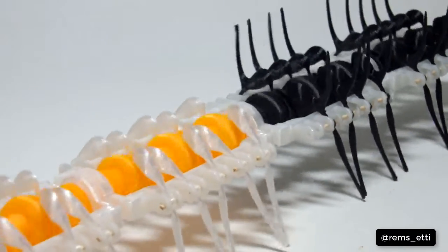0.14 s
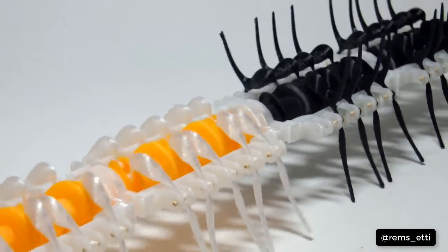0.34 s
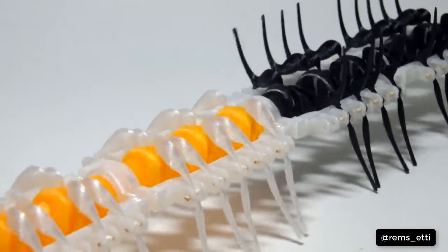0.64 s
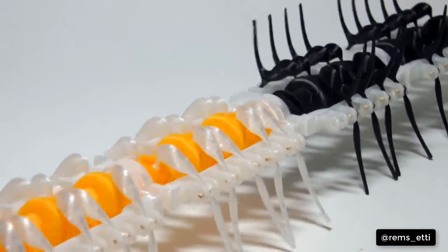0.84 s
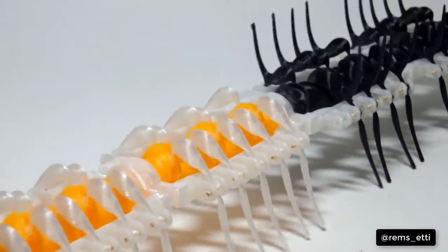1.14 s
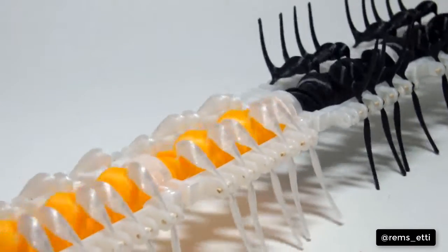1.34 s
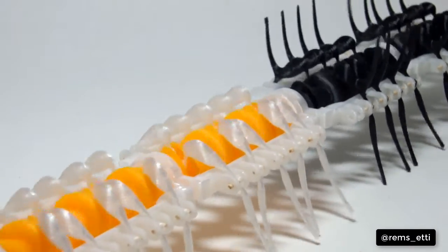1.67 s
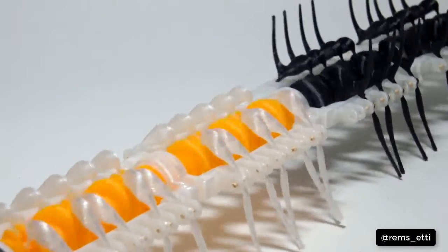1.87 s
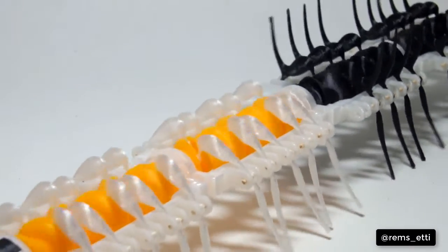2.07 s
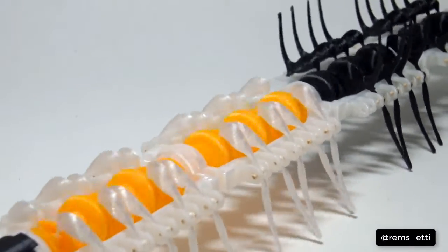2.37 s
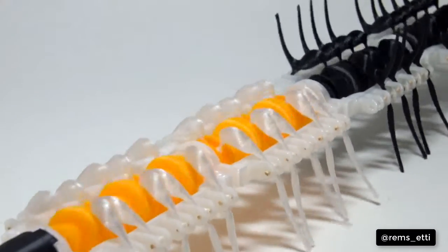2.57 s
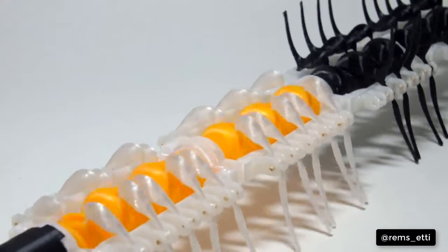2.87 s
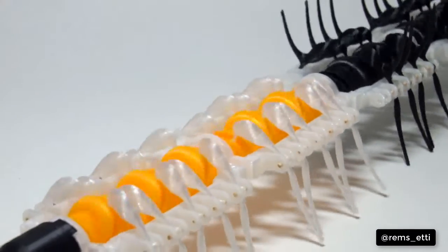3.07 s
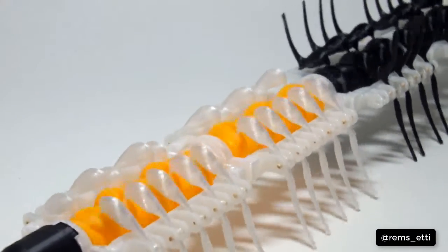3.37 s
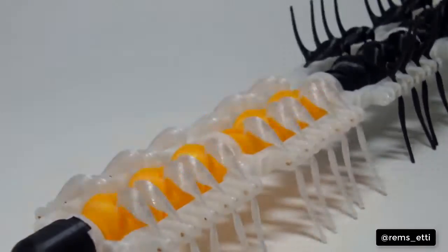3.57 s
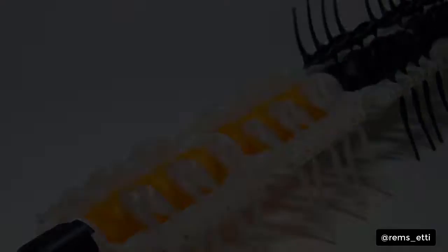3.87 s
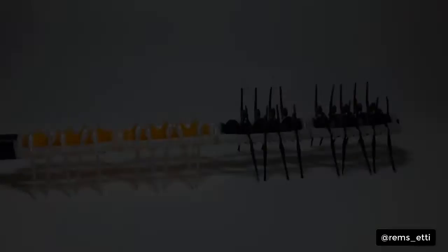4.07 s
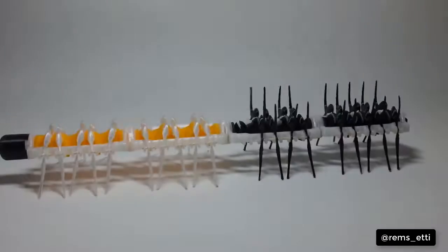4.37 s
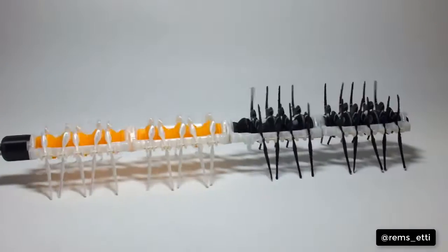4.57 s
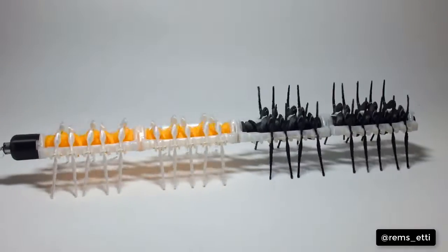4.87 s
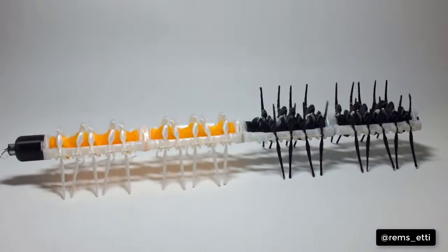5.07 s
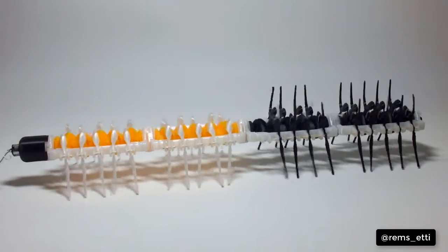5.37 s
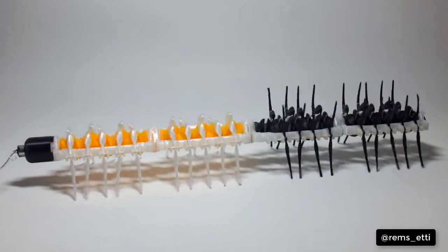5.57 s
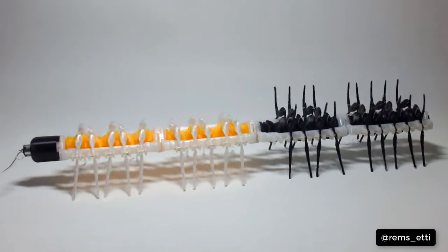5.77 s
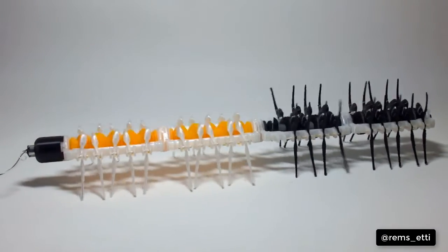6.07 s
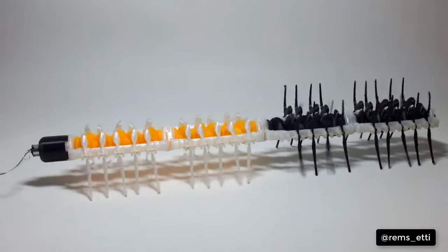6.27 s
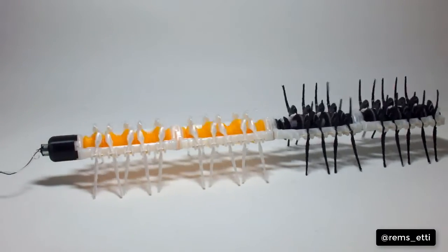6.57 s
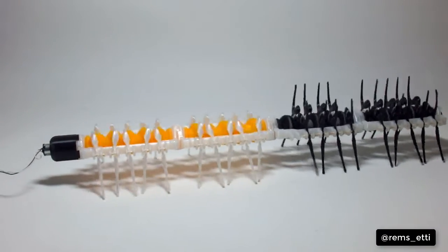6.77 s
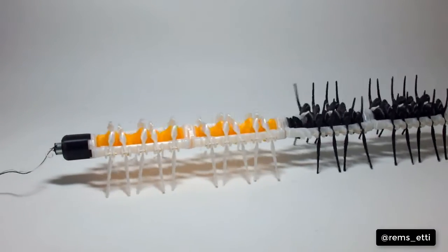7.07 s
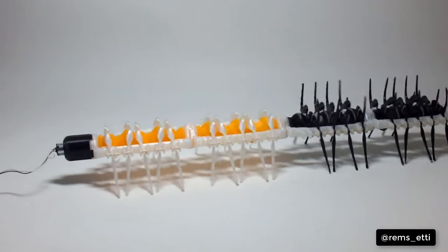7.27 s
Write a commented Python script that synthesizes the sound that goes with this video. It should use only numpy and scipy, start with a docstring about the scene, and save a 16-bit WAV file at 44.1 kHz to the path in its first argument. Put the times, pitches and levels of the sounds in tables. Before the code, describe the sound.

From 0 s a small motorized plastic model with many legs is already walking on a table, close to the microphone. A continuous broadband rub, dry and hissy with a hollow plastic body, surges every 0.45 s as the cam shaft turns. Two thin gear whines near 12 and 15 kHz waver with the load. Tiny squeaks of 20 to 90 ms, around 2.4 to 6 kHz and above 11 kHz, chirp constantly. Bright leg snaps tick at about 0.85, 1.3, 2.2, 3.4 and 4.45 s. Low table thrum grows around 3 s. From 3.5 to 4.55 s a farther pass overlaps the near one, briefly thicker, then continues alone: the same even rubbing, fainter whines, fewer squeaks, recurring chirps near 2.8 kHz. A faint low table hum appears near 7.15 s, over barely audible mains hum. It stops at 7.4 s, still running.

```python
"""Cams and legs of a many-legged plastic model rub and squeak once a turn as it walks on a table:
rubbing is noise through frame resonances, squeaks are gliding near-sines, snapping legs tick.
A small geared motor turns the cam shaft; its two gear whines are narrow noise that swings in pitch
as the load comes and goes. Mains hum, two steady sines, lies below.
A near pass and a farther pass overlap for a second."""
import sys
import numpy as np
from scipy import signal
from scipy.fft import rfft, irfft, next_fast_len
from scipy.io import wavfile

SR = 44100
rng = np.random.default_rng(int(sys.argv[2]) if len(sys.argv) > 2 else 0)


def how_loud(loudness_db):
    """Turn decibels into a plain amplitude multiplier (0 dB gives 1, 20 dB gives 10)."""
    steps = np.asarray(loudness_db, float) / 20
    return 10 ** steps


def file_out(sig):
    """Save sig as 16-bit WAV at sys.argv[1]."""
    # one column per channel
    cols = np.atleast_2d(sig).T
    # limit, then scale
    lim = np.clip(cols, -1, 1)
    pcm = np.round(lim * 32767).astype(np.int16)
    wavfile.write(sys.argv[1], SR, pcm)


N = 327222
TIME = np.arange(N) / SR
# passes: start/s, end/s, period of one shaft turn/s
NEAR_PASS, FAR_PASS = (0, 4.555, .4465), (3.54, 7.42, .4485)
# the loudest squeaks, stick-slip save the rows at .841 and 1.296 s, which are the bright tonal core of a short
# broadband tick: [t/s, length/s, start f/Hz, end f/Hz, peak rms level/dB before flutter]
LOUD_SQUEAKS = [(.035, .033, 14840, 15300, -37), (.196, .025, 5800, 5770, -41),
                (.21, 0.031, 4560, 4730, -36), (0.412, 0.075, 11500, 12400, -41),
                (.486, .034, 14960, 14700, -39), (0.566, 0.027, 2330, 2300, -41.5),
                (0.59, 0.036, 11060, 11600, -32), (.703, 0.043, 14650, 14850, -39),
                (.841, 0.031, 12100, 12260, -34.5), (0.945, 0.021, 14240, 14140, -39),
                (1.01, .04, 2380, 2320, -40), (1.296, 0.025, 13400, 13230, -36),
                (1.384, .02, 14540, 14700, -38), (1.487, .025, 11400, 11200, -31.5),
                (1.604, 0.028, 4620, 4520, -36.5), (1.763, .024, 11290, 11470, -37),
                (1.82, 0.037, 11770, 11600, -39), (1.9, .022, 4960, 4940, -37),
                (1.906, 0.062, 2390, 2330, -44), (2.033, .074, 2790, 2800, -41),
                (2.053, 0.031, 5700, 5900, -41), (2.182, 0.027, 12210, 12210, -35),
                (2.345, 0.022, 5000, 5300, -33.5), (2.349, 0.043, 2440, 2390, -40),
                (2.377, 0.045, 6190, 6120, -36.5), (2.454, .022, 4930, 4920, -38.5),
                (2.56, .09, 2400, 2370, -46), (2.705, .05, 14940, 15040, -38),
                (2.712, .02, 5200, 5050, -41), (2.786, .02, 5150, 4800, -42), (2.76, .028, 6610, 6550, -41),
                (2.795, .05, 2470, 2340, -40), (2.814, 0.053, 11000, 10800, -36),
                (2.842, 0.037, 6025, 5900, -37.5), (2.91, 0.025, 4800, 4520, -36),
                (2.939, 0.034, 4610, 4600, -39), (2.973, .04, 3250, 3450, -42),
                (3.146, 0.04, 4880, 5220, -40), (3.155, 0.016, 11160, 11000, -32.5),
                (3.272, 0.063, 6210, 5700, -37.5), (3.383, .036, 13180, 13580, -34),
                (3.393, 0.022, 9100, 8950, -34), (3.393, 0.025, 4500, 4650, -33),
                (3.61, 0.02, 5060, 5250, -37), (3.676, 0.041, 11400, 11100, -36),
                (3.748, .075, 2823, 2850, -33.5), (3.853, 0.029, 4590, 4570, -36),
                (3.854, .03, 13530, 13450, -36), (4.1, .024, 15160, 15310, -30),
                (4.153, 0.026, 5000, 5080, -37), (4.212, 0.049, 2780, 2950, -34.5),
                (4.26, .045, 2900, 2580, -39), (4.31, 0.029, 9190, 9180, -36.5),
                (4.443, 0.036, 12350, 11900, -31), (4.566, 0.03, 6030, 6000, -35.5),
                (4.579, 0.054, 11730, 11130, -38), (4.663, 0.061, 2870, 2830, -35),
                (4.983, 0.019, 2520, 2520, -39), (5.108, 0.056, 2860, 2800, -36.5),
                (5.452, .042, 11400, 11200, -36), (5.569, 0.05, 2820, 2820, -36.5),
                (5.619, 0.057, 2790, 2670, -40), (6.008, 0.054, 2750, 2860, -36.5),
                (6.063, 0.05, 2780, 2510, -40), (6.161, .026, 11900, 12100, -42),
                (6.353, .035, 11100, 11320, -36), (6.461, 0.055, 2830, 2890, -37.5),
                (6.746, .044, 12750, 12710, -43), (6.802, 0.025, 11340, 11300, -31.5),
                (6.904, 0.067, 5340, 5880, -37), (6.911, 0.056, 2800, 2860, -41),
                (7.139, .042, 13890, 14170, -42), (7.345, 0.058, 2820, 2860, -36)]


def rms_one(x):
    """Normalises a signal to unit effective value."""
    return x / np.sqrt(np.mean(np.abs(x) ** 2) + 1e-20)


def at_hz(points, hz):
    """Reads a spectrum along a logarithmic frequency axis."""
    points_hz, values = np.transpose(points)
    return np.interp(np.log(hz), np.log(points_hz), values)


def in_time(rows):
    """Columns of a time table as envelopes, joined by lines."""
    s, *columns = np.transpose(rows)
    return [np.interp(TIME, s, c) for c in columns]


def over_turn(rows, turn_s):
    """Columns of a table over one turn as periodic modulation at the shaft rate."""
    share, *columns = np.transpose(rows)
    return [np.interp(TIME / turn_s % 1, share, c, period=1) for c in columns]


def drift(rate):
    """Low-frequency random modulation of spread about 1: random points, rate a second, joined by lines."""
    return 1.22 * np.interp(TIME * rate, np.arange(3200), rng.standard_normal(size=3200))


def during(span):
    """Gates a sound to the duration of one pass."""
    return (TIME >= span[0]) & (TIME < span[1])


def lean(pan_db):
    """Interaural-type level difference L-R as a gain for each of two microphone ports."""
    return how_loud([[pan_db / 2], [-pan_db / 2]])


def place(phase, late, size, pan_db):
    """Phase and level difference place a tone: the right port lags by late radians; size is rms."""
    return np.sqrt(2) * size * lean(pan_db) * np.sin([phase, phase - late])


def rub_levels(unsteady_db):
    """Incoherent superposition: the six layer levels of the overlapping passes add in power."""
    # slow level in each pass: [t/s, table thrum level/dB, frame level/dB, cam rub level/dB, gear hiss level/dB]
    near_slow, far_slow = [(0, -5.5, -2.5, -1.5, -2), (.7, -1.5, -3, -1.65, -1.5),
                           (1.4, -3.5, -2.5, -1.5, -2.5), (2.1, -2, -1.5, 1, -1),
                           (2.6, -2.5, -1.5, -0.5, -2.5), (3.05, 5.5, -1, -0.3, 0),
                           (3.5, 2.5, -1, 0.5, -0.5), (4.0, 2.5, -0.5, -0.2, 1), (4.555, 4, -3, 0.5, -4)], [(3.54, 5.5, -0.15, 0.35, 1.6), (4.57, -1.5, -1.5, -0.13, 1.3),
                                             (5.3, -2, -1.3, -0.88, 0.081), (6, -2.5, -1.1, -0.38, 0),
                                             (6.7, -2, -0.43, -0.46, 0.17), (7.1, -2, -0.83, .3, 0),
                                             (7.42, 0, -0.045, 0.95, 0.17)]
    # load on the cams over one turn: [share of turn, cam rub level/dB, gear hiss level/dB]
    near_load, far_load = [(0, 1, 1.5), (.08, -0.5, 1), (.17, -1, -1), (.25, 1, 2.5), (.33, -0.9, -1.5),
                           (.42, 0.5, -0.5), (.52, 1, 2.5), (.6, 0.5, 0), (.67, 2, 2.5), (.83, 2, -1),
                           (.92, 2.3, -1)], [(0, -1, -1), (.08, 1.6, 2.5), (.17, -1.1, -1.5),
                                              (.33, 0, -1.5), (.42, -0.5, -3), (.5, 0.96, -.8), (.6, 2, 0),
                                              (.75, 1.2, 0), (.83, -1.1, -2.5), (.9, -1.3, 0.5),
                                              (.96, -0.52, 2.5)]
    # the cams' rasp around 3 kHz surges once a turn: [share of turn, level/dB]
    near_rasp, far_rasp = [(0, 1), (.08, -1.5), (.2, 1), (.33, -0.5), (.46, -1.5), (.55, -0.5), (.61, 3),
                           (.75, 3), (.86, 2), (.92, 1.5)], [(0, -.5), (.12, 1.4), (.17, -1.5), (.3, -2.5), (.39, -1),
                                              (.43, 0.5), (.6, 2), (.75, 1.5), (.8, 1), (.92, -1)]
    thrum_follows, frame_follows = 0.24, 0.74    # share of the cam rub's swing felt lower down
    power = 1e-9
    for slow, load, rasp, span in [(near_slow, near_load, near_rasp, NEAR_PASS),
                                   (far_slow, far_load, far_rasp, FAR_PASS)]:
        cam_db, gear_db = over_turn(load, span[2])
        rasp_db, = over_turn(rasp, span[2])
        thrum, frame, cam, gear = in_time(slow)
        level_db = np.array([thrum + thrum_follows * cam_db, frame + frame_follows * cam_db,
                             cam + cam_db, cam + rasp_db, cam + cam_db, gear + gear_db])
        power = power + how_loud(2 * level_db) * during(span)
    return 10 * np.log10(power) + np.array([depth_db * drift(8) for depth_db in unsteady_db])


def rubbing(grit_db, flicker_db, shared_db, unsteady_db):
    """Friction as random excitation of modes: dense tiny slips ring the frame, narrow bands flicker."""
    # limits of the six layers from table thrum up to gear hiss: [f/Hz]
    layer_edges_hz = [20, 320, 1100, 2200, 4200, 10000, 15730]
    # spectrum of the rubbing noise, only its shape counts: [f/Hz, density level/dB]
    colour = [(20, -23), (45, -29), (75, -21.5), (110, -13), (190, -11.5), (340, -8.5), (520, -10.5),
              (800, -5), (1300, -4), (2600, -3), (5800, -4), (6700, -6.5), (9000, -5.5), (12000, -4),
              (15700, -6)]
    # plastic frame resonances: [f/Hz, width/Hz, lift/dB]
    frame_modes = [(139, 27, 5), (230, 18, 6), (296, 16.5, 5.5), (374.4, 52, 9), (724, 26, 5),
                   (883, 40, 3.5), (1328, 115, 3.5), (1783, 330, 3.5), (2390, 260, 1.5), (2830, 150, -0.5),
                   (3250, 860, 3.5), (5000, 130, 2), (5940, 340, 2)]
    # correlation between left and right: [f/Hz, coefficient]
    likeness = [(60, 0.32), (120, 0.78), (480, 0.84), (1500, 0.63), (3100, 0.52), (5200, 0.23),
                (6500, 0.0016), (8400, -0.26), (10600, 0.098), (14000, -0.34), (15500, -0.17)]
    # level difference L-R: [f/Hz, level/dB]
    rub_lean = [(60, -1), (150, -3.5), (380, -2.5), (950, -3.5), (2380, -5), (5980, -2.0), (15000, 1)]
    rub_db, far_pan_db = -30.5, 0.1    # usual full-band rms level; L-R shift once the far pass is alone

    size = next_fast_len(N)
    hz = np.maximum(np.arange(size // 2 + 1) * SR / size, 1)
    colour_db = at_hz(colour, hz)
    for centre_hz, width_hz, lift_db in frame_modes:
        colour_db = colour_db + lift_db / (1 + (2 * (hz - centre_hz) / width_hz) ** 2)

    slips = how_loud(grit_db * np.minimum(rng.exponential(1, size), 5))    # uneven slip sizes, heard by both ports
    mid, side = rfft(rng.standard_normal((2, size)) * slips)
    alike = np.clip(at_hz(likeness, hz), -.99, .99)
    pair = np.sqrt(1 + alike) * mid + np.sqrt(1 - alike) * side * [[1], [-1]]
    pair = pair * how_loud(colour_db) * how_loud(at_hz(rub_lean, hz) / 2 * [[1], [-1]])
    pair = pair / np.std(irfft(pair, size))

    out, together = 0, drift(40)
    bands_per_layer = [2, 4, 4, 4, 4, 5]
    layers = zip(rub_levels(unsteady_db), layer_edges_hz, layer_edges_hz[1:], bands_per_layer)
    for level_db, low, high, count in layers:
        edges = np.geomspace(low, high, count + 1)
        for a, b in zip(edges, edges[1:]):
            depth = np.clip(np.log(b / 100) / 4, .3, 1)          # higher bands flicker more
            band = irfft(pair * ((hz >= a) & (hz < b)), size)[:, :N]
            flicker = depth * (flicker_db * drift(35) + shared_db * together)
            out = out + band * how_loud(rub_db + level_db + flicker)
    shift_db = far_pan_db * (TIME >= NEAR_PASS[1])
    return out * how_loud(shift_db / 2 * [[1], [-1]])


def whines(speeds, turn, span, mesh_hz, trend_db, width_hz, wander, patchy_db, pan_db):
    """Gear mesh excitation: narrow noise whose frequency follows motor speed under the changing load."""
    start, end, turn_s = span
    speed, = over_turn(speeds, turn_s)
    levels_db = over_turn(turn, turn_s)
    whine_follows = (1, .5)    # exponent on relative speed for the low and the high whine
    blur = signal.butter(2, width_hz / 2, fs=SR, output="sos")
    out = 0
    for centre_hz, level_db, db_per_s, follows in zip(mesh_hz, levels_db, trend_db, whine_follows):
        hz = centre_hz * speed ** follows * (1 + wander * drift(25))
        trend = db_per_s * (TIME - (start + end) / 2)
        level = how_loud(level_db + trend + patchy_db * drift(30))
        real, imag = signal.sosfilt(blur, rng.standard_normal((2, 3, N)))
        shared, *own = real + 1j * imag       # so short a wave reaches each port by its own paths
        rough = rms_one(0.43 * shared * [[1], [-1]] + np.array(own))
        carrier = np.exp(2j * np.pi * np.cumsum(hz) / SR)
        out = out + np.sqrt(2) * level * lean(pan_db) * (rough * carrier).real
    return out * during(span)


def near_whines():
    """Frequency modulation by load: the two gear whines of the near pass."""
    # motor speed over one turn of the shaft: [share of turn, relative speed]
    near_speed = [(0, .985), (.1, 1.01), (.25, 1.05), (.38, .98), (.5, .92), (.62, .99), (.75, 1.055),
                  (.88, .97), (.93, .95)]
    # whine strength in mid pass: [share of turn, low whine rms level/dB, high whine rms level/dB]
    near_turn = [(0, -41.5, -43), (.1, -38.5, -44), (.25, -44, -43), (.38, -48, -41), (.5, -49, -46),
                 (.62, -53, -43), (.75, -45, -43), (.9, -44, -42)]
    # mesh_hz: low and high whine at usual speed; trend_db: their change in dB per s
    return whines(near_speed, near_turn, NEAR_PASS, mesh_hz=(11700, 14800), trend_db=(0, -2),
                  width_hz=740, wander=0.0094, patchy_db=1.5, pan_db=0.0)


def hum():
    """Steady periodic vibration: mains lines as sines."""
    # mains lines: [f/Hz, rms level/dB as the mean of both ports]
    mains_lines = [(59.8, -76.5), (119.8, -63)]
    return sum(place(2 * np.pi * hz * TIME, 0, how_loud(db), -3.2) for hz, db in mains_lines)


def glides(rows, wobble, flutter_db, steeper=0.49):
    """Self-sustained oscillation: gliding near-sines, rough in strength, shaken in pitch.

    wobble is the pitch shake as a share at 3 kHz; steeper is its exponent over frequency."""
    path_spread_s = 3e-5    # spread of the delay between the ports
    out, shake, flutter = np.zeros((2, N)), drift(400), drift(250)
    lag_s = path_spread_s * rng.standard_normal(len(rows))
    offset = rng.integers(0, N, len(rows))
    for (s, length, start_hz, end_hz, peak_db, pan_db), lag, skip in zip(rows, lag_s, offset):
        at = np.arange(round(s * SR), min(round((s + max(length, .005)) * SR), N))
        own = (at + skip) % N                                # every tone shakes in its own way
        hz = np.linspace(start_hz, end_hz, len(at))
        hz = hz * (1 + wobble * (hz / 3000) ** steeper * shake[own])
        swell = np.sqrt(np.abs(np.sin(np.linspace(0, np.pi, len(at)))))
        size = swell * how_loud(peak_db + flutter_db * flutter[own])
        out[:, at] += place(2 * np.pi * np.cumsum(hz) / SR, 2 * np.pi * start_hz * lag, size, pan_db)
    return out


def placed(rows, spread_db):
    """Frequency-dependent level difference: adds the L-R lean for each squeak's pitch, give or take."""
    # usual lean of a squeak: [f/Hz, L-R level/dB]
    squeak_lean = [(2300, -9), (2850, -3.5), (5000, -2.5), (6100, -6), (11000, 1), (15000, 0)]
    rows = np.array(rows)
    pan_db = at_hz(squeak_lean, rows[:, 2]) + spread_db * rng.standard_normal(len(rows))
    return np.c_[rows, pan_db]


def turn_squeaks(joints, span):
    """Periodic stick-slip: each joint squeaks once a turn with chance; a loud squeak takes its place."""
    start, end, turn_s = span
    spread_s, spread_db, detune = .005, 1.1, 0.00854    # turn-to-turn chance; detune is a share of pitch
    rows, loud = [], np.array(LOUD_SQUEAKS)
    for turn in range(int(start / turn_s), int(end / turn_s) + 1):
        chance = rng.standard_normal((len(joints), 3))
        for joint, (late, off, size) in zip(joints, chance):
            share, length, start_hz, end_hz, peak_db, db_per_s = joint
            s = (turn + share) * turn_s + spread_s * late
            tune = 1 + detune * off
            level_db = peak_db + db_per_s * (s - (start + end) / 2) + spread_db * size
            same_time = np.abs(loud[:, 0] - s) < .025
            same_pitch = np.abs(loud[:, 2] / start_hz - 1) < .05
            if start <= s < end - .01 and not np.any(same_time & same_pitch):
                rows.append((s, length, start_hz * tune, end_hz * tune, level_db))
    return rows


def faint_chirps(peak_db, count):
    """A random point process: the many lesser joints chirp at chance times and pitches."""
    when, length, pitch, glide, size, side = rng.random((count, 6)).T
    hz = 1200 * 11.0 ** pitch
    rows = np.transpose([when * TIME[-1], 0.017 + 0.0267 * length, hz, hz * (.95 + 0.0767 * glide),
                         peak_db - 6 * size, 8 * side - 6])
    return glides(rows, wobble=0.0087, flutter_db=4.5)


def near_squeaks():
    """Stick-slip friction, strongly shaken in pitch: the joints of the near pass."""
    # joints nearing or leaving the microphone:
    # [share of turn, length/s, start f/Hz, end f/Hz, peak rms level/dB in mid pass, change/dB per s]
    near_joints = [(.06, .03, 4950, 5100, -45.5, 0), (.08, .035, 14850, 14500, -39, -1),
                   (.24, 0.047, 2424, 2305, -44.5, 0.5), (.25, 0.029, 4870, 4940, -48, 0.5),
                   (.32, 0.042, 11230, 11200, -42, -2), (.34, 0.05, 6200, 5970, -41.5, 1),
                   (.38, 0.041, 2390, 2290, -45.5, 2.5), (.41, .055, 5732, 4930, -45.5, 1.5),
                   (.45, 0.035, 10480, 10630, -43.5, 0.5), (.5, 0.025, 4740, 4600, -45, -1),
                   (.555, 0.087, 2793, 2870, -44.5, -2), (.58, 0.053, 14700, 15100, -44, -1),
                   (.59, 0.036, 4640, 4490, -47, 1), (.59, 0.03, 5750, 5740, -45, 0),
                   (.6, 0.016, 9130, 9100, -40, 3), (.74, 0.068, 2410, 2348, -45.5, 0.5),
                   (.89, 0.024, 12300, 12180, -40, -1), (.89, 0.032, 13550, 13380, -45, 1)]
    rows = turn_squeaks(near_joints, NEAR_PASS)
    return glides(placed(rows, spread_db=1.0), wobble=.02, flutter_db=4.5, steeper=-.3)


def loud_squeaks():
    """Stick-slip friction at its strongest: the squeaks that stand out singly, along with the bright tonal
    cores of two ticks."""
    return glides(placed(LOUD_SQUEAKS, spread_db=1.0), wobble=.011, flutter_db=4.0, steeper=.25)


def ring_swells():
    """Resonance: noise through one frame mode swells and fades as the model walks on."""
    # modes that ring more for a while: [mid t/s, length/s, f/Hz, width/Hz, peak rms level/dB, mean of ports]
    swells = [(2.14, 2.5, 365, 50, -57.5), (3.45, 1.6, 1370, 130, -48), (6.4, 2.6, 1690, 170, -49),
              (2.6, 1.9, 5650, 1100, -46.5)]
    out = 0
    for s, length, hz, width_hz, peak_db in swells:
        band = signal.butter(1, [hz - width_hz / 2, hz + width_hz / 2], "band", fs=SR, output="sos")
        swell = np.exp(-((TIME - s) / (length / 2)) ** 2)
        out = out + how_loud(peak_db) * swell * rms_one(signal.sosfilt(band, rng.standard_normal(N)))
    return out * lean(-3)


def ticks():
    """Impulsive excitation: a leg snaps off its cam in a short bright noise burst, unlike at the ports."""
    # snaps: [t/s, level/dB, taken as 10 above the rms level at the burst's peak]
    snaps = [(0.848, -22), (1.2944, -19), (2.1899, -24), (3.3894, -26), (4.4478, -22)]
    length_s, band_hz = 0.011, (10500, 14500)
    swell = sum(how_loud(db - 10) * np.exp(-((TIME - s - length_s / 2) / (length_s / 2)) ** 2)
                for s, db in snaps)
    band = signal.butter(2, band_hz, "band", fs=SR, output="sos")
    return swell * rms_one(signal.sosfilt(band, rng.standard_normal((2, N))))


def far_whines():
    """Frequency modulation by load: the two gear whines of the farther pass."""
    # motor speed over one turn of the shaft: [share of turn, relative speed]
    far_speed = [(0, 1.02), (.12, 1.06), (.22, .975), (.33, .93), (.45, .97), (.6, 1.055), (.72, .99),
                 (.8, .955), (.9, .98)]
    # whine strength in mid pass: [share of turn, low whine rms level/dB, high whine rms level/dB]
    far_turn = [(0, -45, -55), (.12, -49, -53), (.22, -46, -49), (.33, -42.5, -50), (.45, -48, -48),
                (.6, -59, -56), (.72, -57, -52), (.8, -44, -48), (.9, -46, -56)]
    return whines(far_speed, far_turn, FAR_PASS, mesh_hz=(11800, 14700), trend_db=(-1, 0),
                  width_hz=420, wander=.01, patchy_db=3.0, pan_db=4)


def far_squeaks():
    """Stick-slip friction: the joints of the farther pass."""
    # joints: [share of turn, length/s, start f/Hz, end f/Hz, peak rms level/dB in mid pass, change/dB per s]
    far_joints = [(.03, .06, 15360, 15370, -46, 1), (.11, 0.03, 2475, 2420, -48, -0.24),
                  (.17, .045, 11200, 11060, -41, 0), (.19, 0.036, 6040, 5990, -43, -.8),
                  (.29, 0.045, 10700, 10500, -44.5, 0), (.4, 0.056, 5620, 5660, -43.5, .5),
                  (.45, 0.026, 4600, 4600, -44, 0.84), (.5, .075, 2830, 2515, -44, 0),
                  (.72, 0.044, 11700, 11700, -45, 0), (.73, .04, 14300, 14170, -49, 0),
                  (.91, 0.032, 5050, 5080, -45.5, -1.8), (.95, .035, 13700, 14100, -44, 0)]
    rows = turn_squeaks(far_joints, FAR_PASS)
    return glides(placed(rows, spread_db=1.0), wobble=.011, flutter_db=4.0, steeper=.25)


def table_hum():
    """Plate vibration: the table top hums briefly on a low gliding tone."""
    # [t/s, length/s, start f/Hz, end f/Hz, peak rms level/dB before flutter, L-R level/dB]
    table_tones = [(7.15, .45, 154.4, 158, -57, -3)]
    return glides(table_tones, wobble=.05, flutter_db=2.0)


def scene():
    """Linear superposition of rubbing, whines, hum, squeaks, swells and ticks."""
    rub = rubbing(grit_db=2.0, flicker_db=0.5, shared_db=0.57,
                  unsteady_db=[1.46, 0.83, 0.32, 0.48, 0.46, 0.7])
    squeaking = near_squeaks() + loud_squeaks() + far_squeaks() + faint_chirps(peak_db=-47.5, count=500)
    gears = near_whines() + far_whines()
    return rub + gears + hum() + squeaking + ring_swells() + ticks() + table_hum()


def roll_off(x):
    """The treble ends steeply here."""
    return signal.sosfilt(signal.butter(12, 16940, fs=SR, output="sos"), x)


def record(dry):
    """Low-pass filtering: an elliptic filter cuts the top steeply."""
    cut = signal.ellip(10, .5, 80, 15740, fs=SR, output="sos")
    return roll_off(signal.sosfilt(cut, dry))


dry = scene()
out = record(dry)
file_out(out)
```